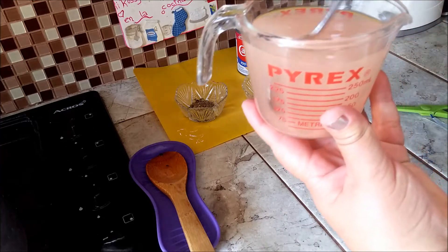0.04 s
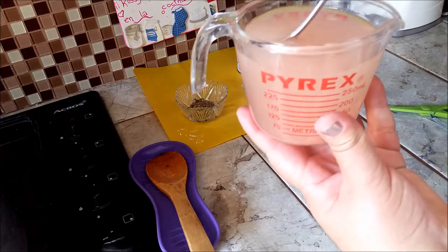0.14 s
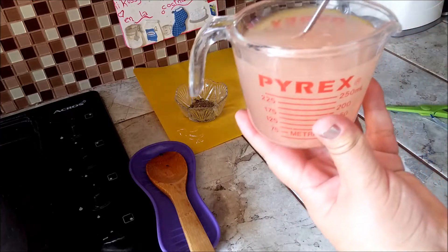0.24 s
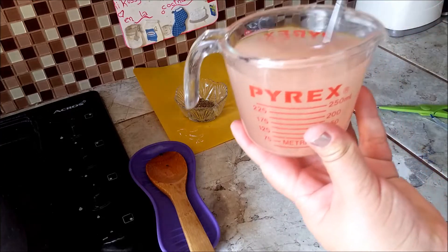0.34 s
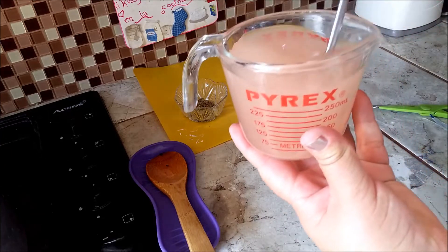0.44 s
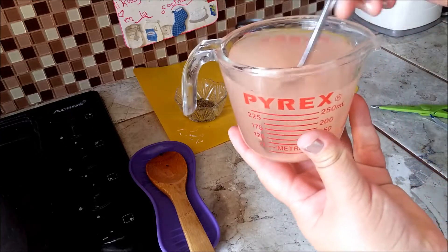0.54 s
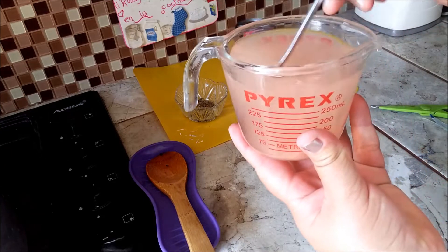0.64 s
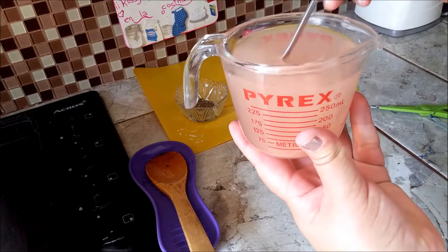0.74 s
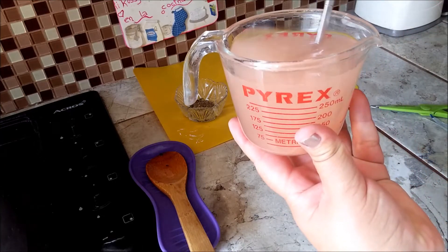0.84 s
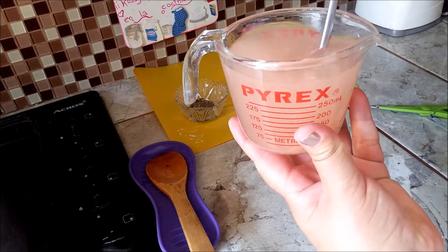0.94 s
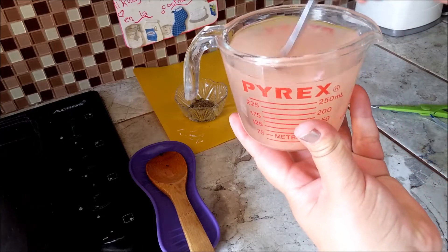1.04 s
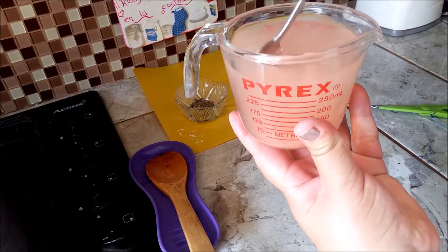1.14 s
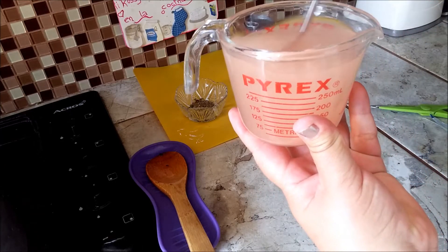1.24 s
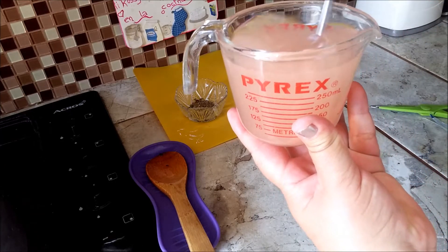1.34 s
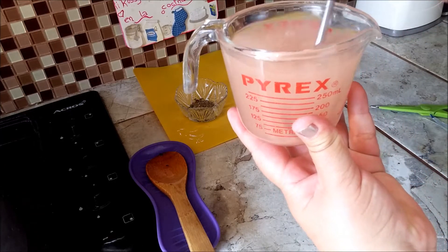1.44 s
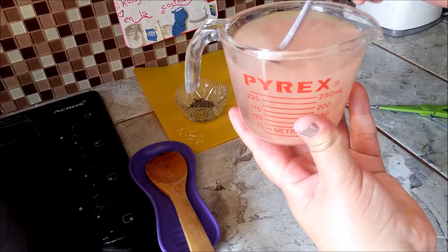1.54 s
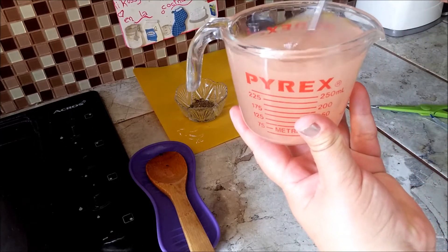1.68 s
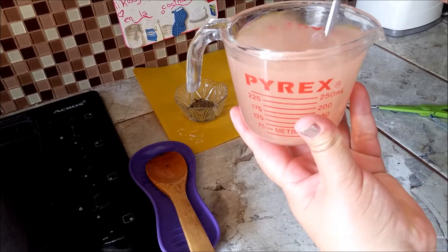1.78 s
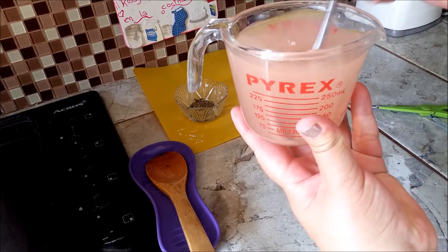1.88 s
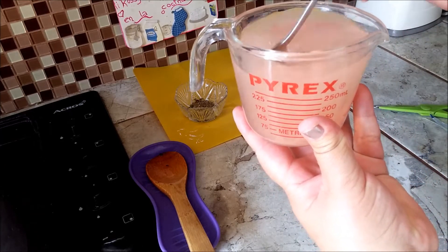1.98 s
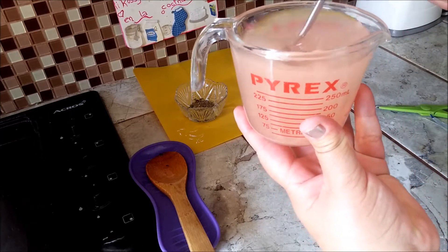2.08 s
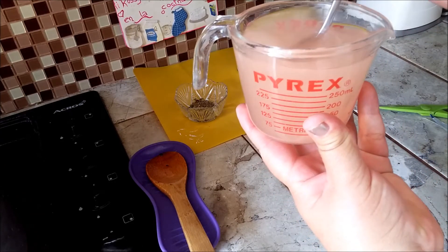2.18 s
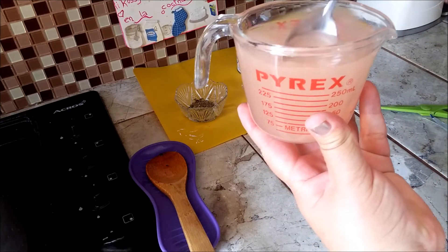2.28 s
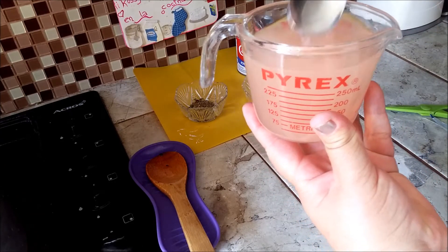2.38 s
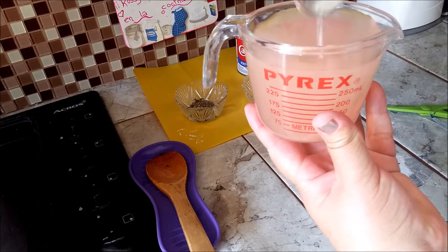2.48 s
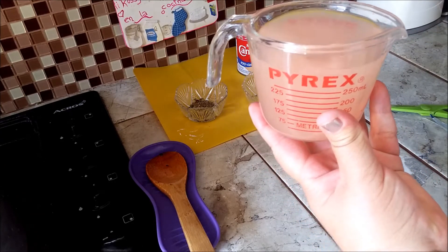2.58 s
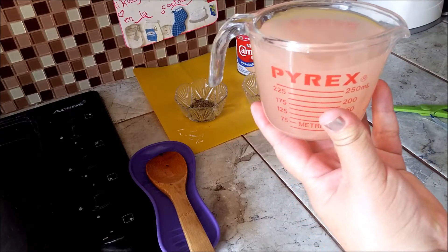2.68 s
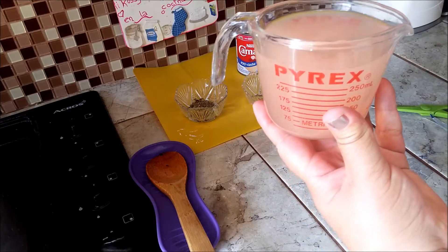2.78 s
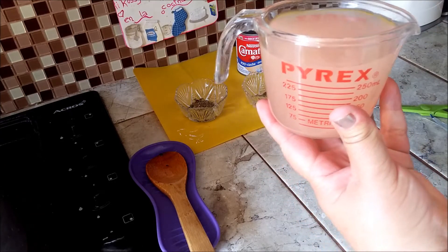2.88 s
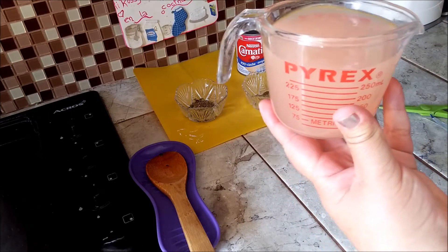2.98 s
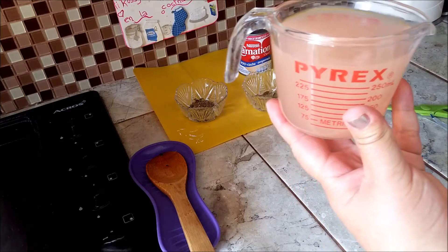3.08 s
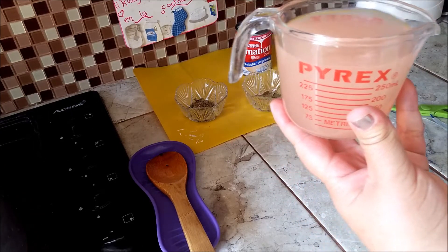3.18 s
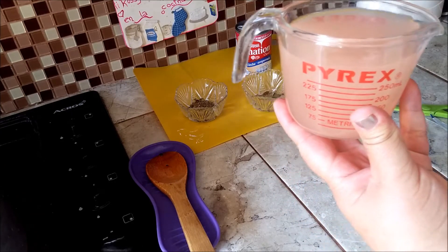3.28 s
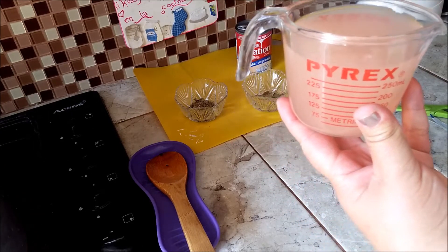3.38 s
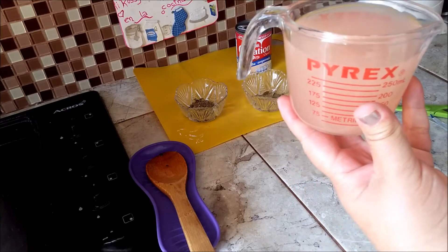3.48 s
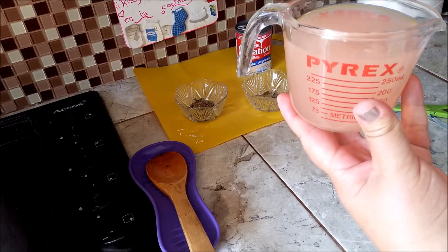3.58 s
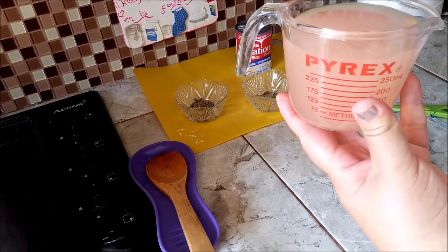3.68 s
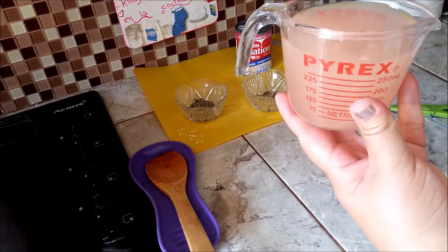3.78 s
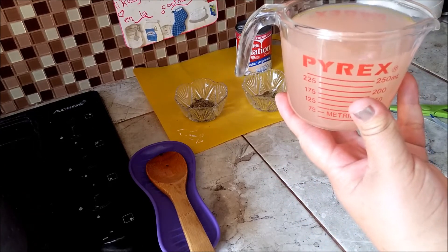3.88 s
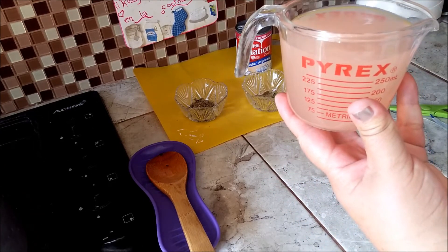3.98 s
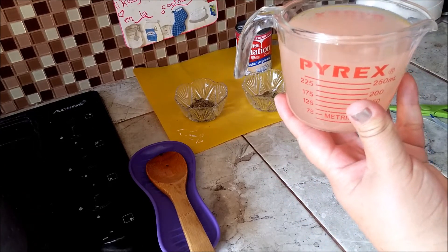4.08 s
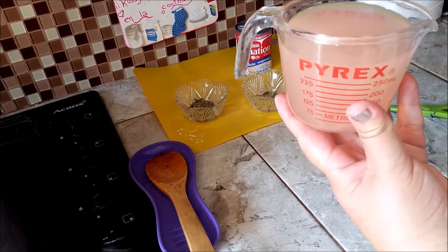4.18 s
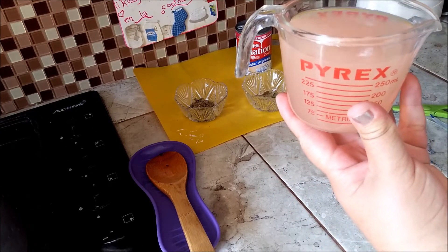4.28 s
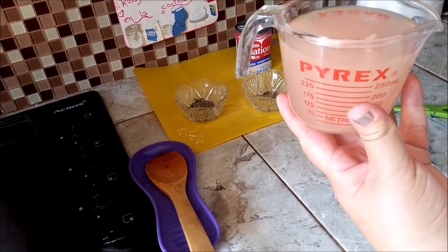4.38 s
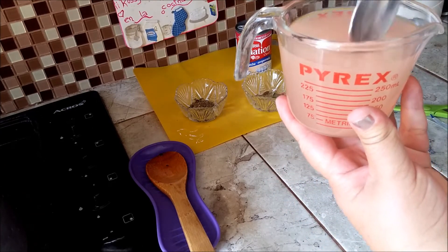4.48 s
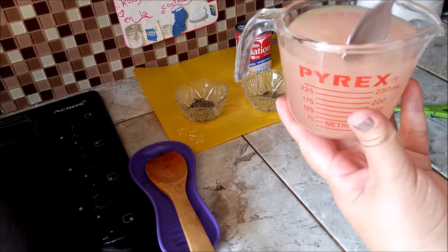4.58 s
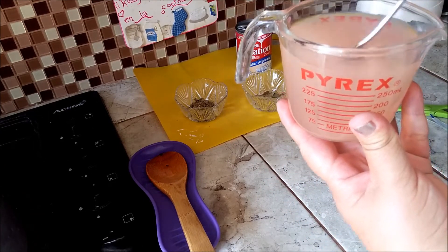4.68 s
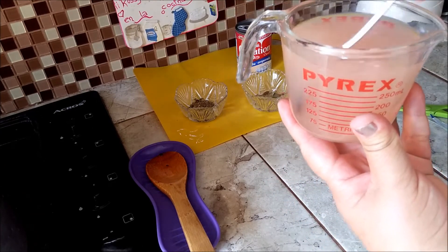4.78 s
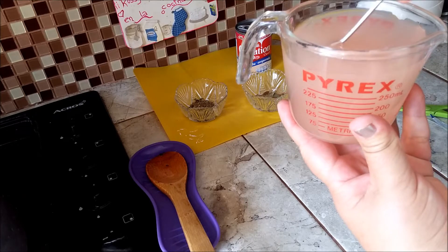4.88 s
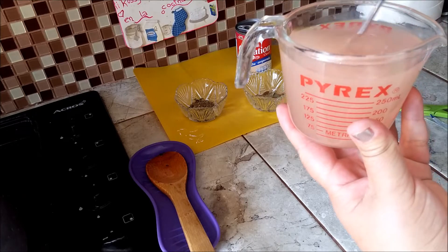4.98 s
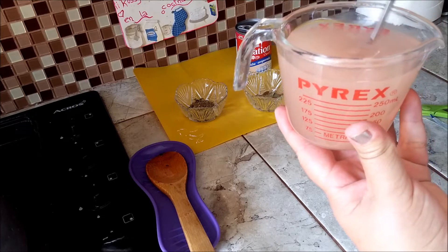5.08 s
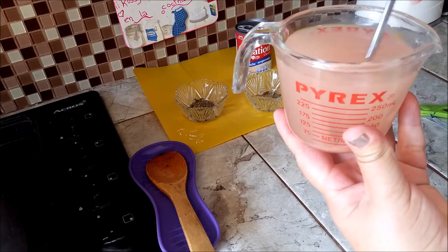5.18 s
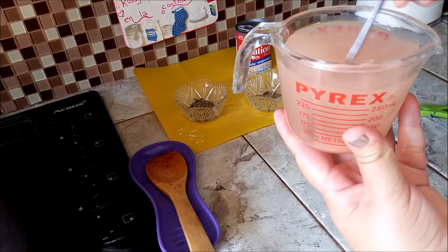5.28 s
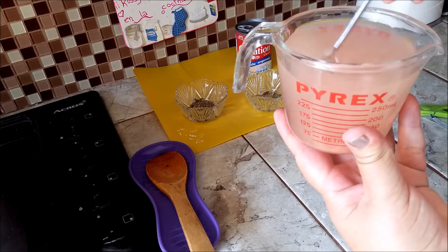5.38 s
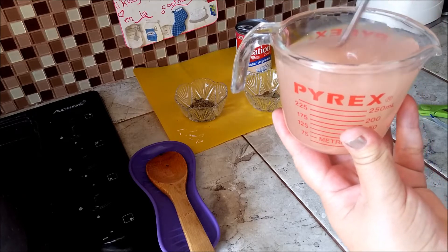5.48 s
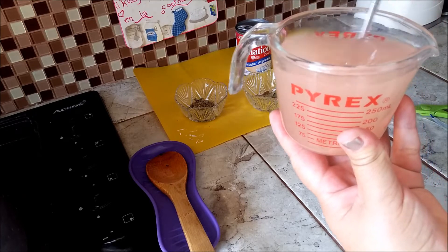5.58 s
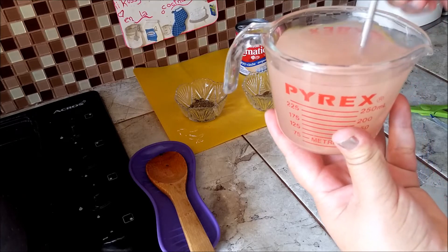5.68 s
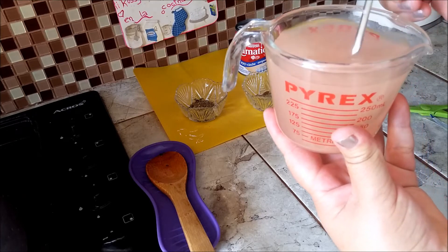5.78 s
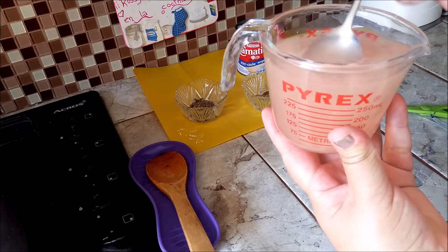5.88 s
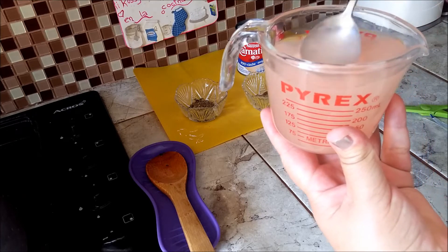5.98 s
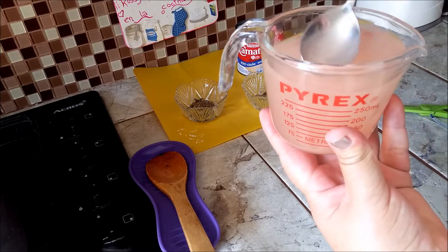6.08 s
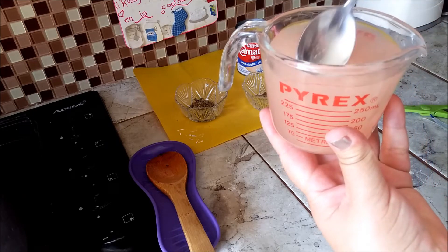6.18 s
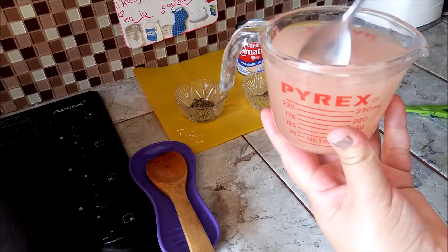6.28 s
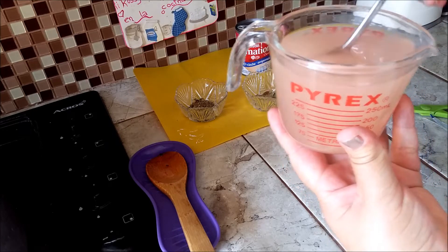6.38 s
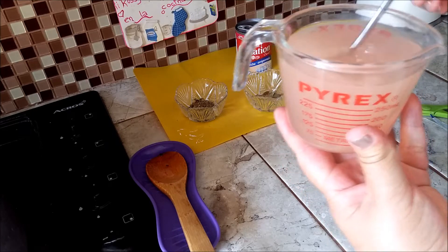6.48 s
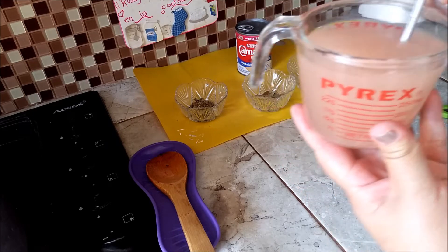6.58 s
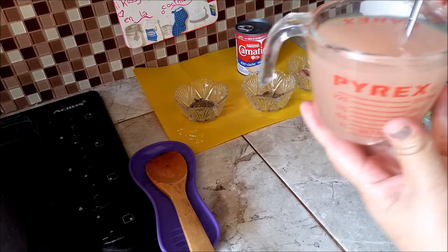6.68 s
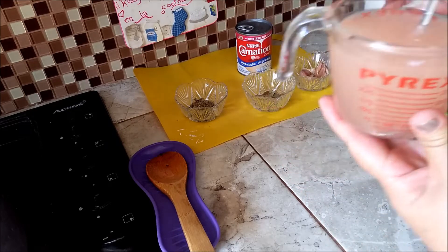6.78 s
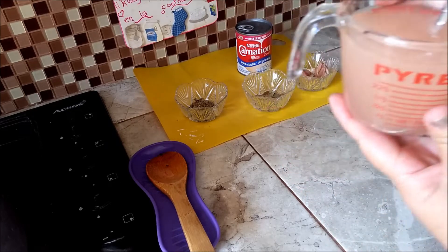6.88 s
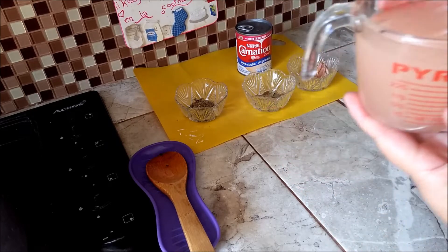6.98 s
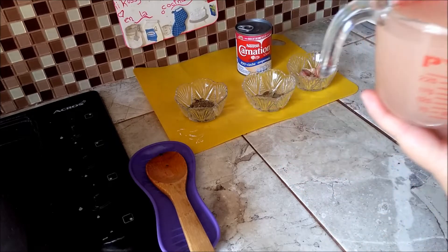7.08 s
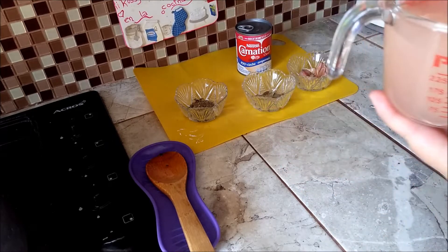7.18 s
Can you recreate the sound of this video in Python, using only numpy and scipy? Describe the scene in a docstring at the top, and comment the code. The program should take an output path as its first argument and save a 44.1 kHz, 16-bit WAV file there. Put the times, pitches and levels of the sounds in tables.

```python
"""A steel spoon stirs liquid in a hand-held glass measuring cup, close up in a tiled kitchen.
For two seconds it clinks briskly, each touch ringing glass and spoon. A lull follows, with a few
bubbles and wet ticks. Near 5 s lighter touches return, detuned by the swirl and choked as the spoon
stays on the glass; one firm clink lands at 6.7 s and two faint ones close. Appliance hum and fan air
lie under it all, and the left channel is much weaker than the right."""
import sys
import numpy as np
from scipy import signal
from scipy.fft import rfft, irfft, next_fast_len
from scipy.io import wavfile

SR = 44100
rng = np.random.default_rng(int(sys.argv[2]) if len(sys.argv) > 2 else 0)


def persist_wave(psi):
    """Save psi, clipped to +-1, as 16-bit WAV."""
    counts = np.round(np.clip(psi, -1, 1) * 32767).astype(np.int16)
    wavfile.write(sys.argv[1], SR, np.atleast_2d(counts).T)


N = 319725
RING_TIME = np.arange(int(.56 * SR)) / SR   # seconds since a hit

# Spoon hits; where each lands sets its mix:
# t/s, contact level/dB, spoon level/dB, low wall level/dB, rim level/dB, rim f/Hz, lead overtone f/Hz
HITS = [(0.0375, -28.5, -31, -27.5, -9, 3193, 6120), (0.2457, -37.5, -24.5, -32.5, -27, 3150, 5400),
        (0.4236, -27.5, -27, -25.5, -14.5, 3165, 4900), (0.562, -27.5, -33, -57, -16, 3164, 5490),
        (0.7814, -48, -42, -50, -49, 3170, 5150), (0.8812, -47, -38, -49, -63, 3150, 5920),
        (0.8926, -35, -32.5, -38.5, -48, 3170, 6210), (1.0548, -23.5, -32.5, -38, -11, 3118, 5330),
        (1.2752, -28.5, -13, -42.5, -12.5, 3115, 5228), (1.3934, -30, -27, -32, -23, 3130, 5610),
        (1.694, -33, -16.5, -46, -25.5, 3075, 5080), (1.7967, -40.5, -36, -41, -35.5, 3160, 5220),
        (1.8694, -46, -30, -45, -58, 3100, 4780), (1.924, -27.5, -31, -37.5, -27, 3114, 4920),
        (2.088, -29.5, -14, -48, -24.5, 3053, 4770), (4.8286, -38.5, -64, -42, -36, 3126, 5830),
        (4.8914, -42, -28.5, -40, -25.5, 3087, 4610), (5.04, -38, -29.5, -51, -41.5, 3115, 5680),
        (5.2624, -47.5, -38, -45.5, -39.5, 3084, 5560), (5.464, -46.5, -36, -47.5, -40, 2950, 4580),
        (5.6006, -40.5, -33.5, -41.5, -43, 3088, 5550), (6.553, -34, -30, -53, -35.5, 3092, 5460),
        (6.6521, -22, -23.5, -28, -16.5, 3391, 5010), (6.999, -44.5, -47.5, -56, -30.5, 3090, 5700),
        (7.136, -65, -50.5, -58, -48, 3060, 5300)]
# The swirl pulls the pitch down; holding the spoon on the glass chokes the ring:
# t/s, spoon f/Hz, low wall f/Hz, ring time/share
SWIRL = [(0.04, 2411, 1251, 0.84), (0.56, 2381, 1214, 0.82), (1.28, 2268, 1236, 0.84),
         (2.089, 2303, 1197, 1), (4.97, 2088, 1232, 0.58), (5.599, 2016, 1216, 0.52),
         (6.6, 1928, 1207, 0.84), (7.0, 1910, 1213, 0.83)]


def clinks(bass_cut_hz=330):
    """Steel strikes glass: both ring, with a sheen of overtones and a hard click on top."""
    out = np.zeros(N)
    swirl_s, *curves = np.transpose(SWIRL)
    attack = 1 - np.exp(-RING_TIME / 0.0008)   # the contact builds up over a moment
    for s, contact_db, spoon_db, low_db, rim_db, rim_hz, lead_hz in HITS:
        spoon_hz, low_hz, ring = (np.interp(s, swirl_s, curve) for curve in curves)
        push_db = contact_db + 0.25 * (spoon_db - contact_db)
        body = glass_wall(low_hz, low_db, push_db, ring)
        body += glass_rim(rim_hz, rim_db, spoon_db, ring)
        body += spoon(spoon_hz, spoon_db)
        top = sheen(contact_db, lead_hz, ring) + contact_click(contact_db, ring)
        add(out, s, attack * (body + skid(top, ring)))
    low_cut = signal.butter(2, bass_cut_hz, "high", fs=SR, output="sos")   # a small cup radiates no bass
    return signal.sosfilt(low_cut, out + 1e-18)


# Higher wall modes: f/Hz, level/dB against the push of the hit, t60/s
HIGH_WALL_MODES = [(1725, -5, 0.73), (2080, -8, 0.57)]


def glass_wall(low_hz, low_db, push_db, ring):
    """The wall gives the long sustain: a beating low mode under two that the spoon can choke."""
    low = from_db(low_db + 1.5) * twin_mode(low_hz, t60=0.49, split_hz=24, share=0.21)
    high = sum(from_db(push_db + db) * ring * mode(hz, t60 * ring) for hz, db, t60 in HIGH_WALL_MODES)
    return low + high


def glass_rim(hz, rim_db, spoon_db, ring):
    """The rim sings a bright, slowly beating note; the next mode up detunes in step with it."""
    t60 = 0.31 * ring
    note = from_db(rim_db - 3) * twin_mode(hz, t60, split_hz=3.1, share=0.45)
    next_db = (rim_db + spoon_db) / 2 - 13.5
    return note + from_db(next_db) * mode(hz * 1.143, t60)


# Dull knock of the spoon's bowl on thick glass: f/Hz, level/dB
KNOCK_EQ = [(100, -12), (350, -10.5), (700, -20.5), (1000, -9), (1500, 4), (2600, 1.5), (3600, -23),
            (8000, -24)]


def spoon(hz, db):
    """The gripped spoon knocks and pings; the liquid damps it at once, leaving a weak after-ring."""
    decay = dying(t60=0.069) + from_db(-34) * dying(t60=0.12)
    ping = unit_attack(np.sin(2 * np.pi * hz * RING_TIME) * decay)
    return from_db(db + 2.5) * (ping + from_db(-12) * burst(KNOCK_EQ))


# Overtones of glass and spoon, in two registers: f/Hz, level/dB, t60/s
LOW_SHEEN = [(2735, -11.5, 0.057), (3040, -65, 0.024), (3736, -4.5, 0.037), (3965, -3, 0.085),
             (4038, -1, 0.044), (4280, -30.5, 0.072), (4150, -24, 0.12)]
HIGH_SHEEN = [(5070, 0, 0.077), (5200, 4, 0.1), (5355, 0, 0.032), (5120, -22, .04), (5207, 12.5, 0.011),
              (5720, -10, 0.16), (6180, 3.5, 0.099), (5940, -14.5, 0.074), (6450, -6.5, 0.18),
              (6800, -11, 0.085)]


def sheen(contact_db, lead_hz, ring):
    """Hard contact wakes the overtones; firm hits favour the lower register."""
    high = from_db(-2.5) * overtones(HIGH_SHEEN, ring)
    lead = from_db(1) * unit_attack(mode(lead_hz, t60=0.044 * ring))
    low = from_db(expand(contact_db, ratio=1.64) - 5) * overtones(LOW_SHEEN, ring)
    return low + from_db(contact_db) * (high + lead)


# Topmost modes of glass and spoon: f/Hz, level/dB, t60/s
TICK_MODES = [(8360, -7, 0.038), (8050, 2, 0.017), (9200, -9, 0.05), (9100, 0, 0.06), (9000, -8, 0.028),
              (10170, -1, 0.1), (10900, -1, 0.013), (11700, -2, 0.027), (12700, -6, .03)]
# Colour of the contact crack: f/Hz, level/dB
CRACK_EQ = [(250, 3), (800, -28), (1400, -5.5), (2600, -4.5), (5000, 7), (6500, 5), (7200, -1), (8500, 3),
            (10500, 0.5), (12500, -7.5), (16000, -28.5)]


def contact_click(contact_db, ring):
    """The transient of steel meeting glass: a pitched tick inside a crack of noise."""
    db = expand(contact_db, ratio=1.015)
    return from_db(db - 15) * overtones(TICK_MODES, ring) + from_db(db + 4.5) * burst(CRACK_EQ)


def skid(hit, ring, slips_per_s=500):
    """The spoon skids on: random slips retrigger the hit, harder when it is held on the glass."""
    slip_db = -11.5 + 15 * (1 - ring)
    slipping = rng.random(len(hit)) < slips_per_s / SR
    slips = slipping * rng.standard_normal(len(hit)) * from_db(slip_db) * dying(t60=0.07)
    slips[0] = 1   # the hit itself
    return signal.fftconvolve(hit, slips)[:len(hit)]


# Bubble blips: t/s, starting f/Hz, level/dB
BLIPS = [(3.314, 996, -35.5), (3.700, 936, -51.5), (4.257, 1040, -50), (5.372, 4940, -26),
         (5.384, 2810, -22.5), (5.385, 3580, -23), (5.441, 984, -43.5), (5.473, 1000, -42),
         (5.851, 3240, -45), (6.88, 2870, -29.5)]


def bubbles(cycles=13.7, rise=0.26):
    """Bubbles bend up in pitch as they near the surface, then stop."""
    out = np.zeros(N)
    for s, hz, db in BLIPS:
        age = np.linspace(0, 1, int(cycles / hz * SR))
        phase = 2 * np.pi * np.cumsum(hz * (1 + rise * age ** 2)) / SR
        envelope = np.minimum(8 * age, 1) * (1 - age ** 3)
        add(out, s, from_db(db) * np.sin(phase) * envelope)
    return out


# Snaps of liquid film: t/s, level/dB
SNAPS = [(0.995, -43.5), (1.1702, -39), (2.7559, -44), (3.111, -53.5), (4.6338, -51), (5.361, -46),
         (5.372, -46), (5.3838, -35), (6.881, -42)]
# Their colour: f/Hz, level/dB
SNAP_EQ = [(1500, 0), (4000, -1), (6500, 1.5), (8500, 1.5), (11000, 3), (13000, -4.5), (16000, -14)]


def wet_ticks():
    """Films of liquid snap with a small, bright tick."""
    out = np.zeros(N)
    for s, db in SNAPS:
        add(out, s, from_db(db + 0.5) * burst(SNAP_EQ))
    return out


# Colour of the kitchen reverb: f/Hz, level/dB against its input
TILE_EQ = [(500, 5), (1000, -1), (1200, -4.5), (1750, -5), (2300, -11.5), (2700, -5.5), (3100, -7.5),
           (3900, -4), (6000, -7.5), (10000, -2.5), (16000, 5)]


def kitchen(send, predelay_s=0.00239, tail_cut_hz=7500):
    """Strong early reflections off worktop and tiles, then the duller tail of the room."""
    early, tail = rng.standard_normal((2, len(RING_TIME)))
    tail = signal.sosfilt(signal.butter(1, tail_cut_hz, fs=SR, output="sos"), tail)
    echoes = from_db(4) * early * dying(t60=0.07) + tail * dying(t60=0.35)
    echoes *= RING_TIME > predelay_s
    response = coloured(echoes / np.linalg.norm(echoes), TILE_EQ)
    return signal.fftconvolve(send, response)[:N]


# Appliance hum: f/Hz, right level/dB, left offset/dB
HUM_LINES = [(61, -65.5, -8.5), (119.9, -81, -22), (239.95, -39, -19.5)]


def appliance_hum(waver_db=1.37):
    """Mains-driven tones whose level wavers slightly."""
    t = np.arange(N) / SR
    knots = np.linspace(0, t[-1], num=40)
    waver = from_db(waver_db * np.interp(t, knots, rng.standard_normal(len(knots))))
    return waver * sum(from_db([[db + left_db], [db]]) * np.sin(2 * np.pi * (hz * t + rng.random()))
                       for hz, db, left_db in HUM_LINES)


# Bed of fan and room air: f/Hz, right level/dB per Hz
AIR_EQ = [(12, -76.5), (30, -100), (80, -96), (110, -80.5), (140, -88.5), (200, -75.5), (300, -81.5),
          (460, -77), (520, -84.5), (800, -91), (1050, -88.5), (1500, -93.5), (6200, -97), (7800, -108),
          (10500, -109), (15500, -120)]
# Its channel balance: f/Hz, left minus right level/dB
AIR_LEFT_TRIM = [(60, -4), (110, -29), (200, -10), (380, -20.5), (700, -10), (1290, -11.5), (2380, -9),
                 (4400, -10.5), (8120, -9), (15000, -2.5)]
# Its width: f/Hz, left-right correlation
AIR_CORRELATION = [(60, -0.084), (130, 0.59), (290, 0.99), (640, 0.4), (1410, -0.29), (3100, 0.18),
                   (6820, -0.3), (15000, 0.3)]


def fan_air():
    """Steady fan noise, narrow in the upper bass and wide elsewhere."""
    hz = np.fft.rfftfreq(N, 1 / SR)
    right, other = rfft(rng.standard_normal((2, N))) * from_db(at_hz(AIR_EQ, hz)) * np.sqrt(SR / 2)
    alike = at_hz(AIR_CORRELATION, hz)
    left = from_db(at_hz(AIR_LEFT_TRIM, hz)) * (alike * right + np.sqrt(1 - alike ** 2) * other)
    return irfft([left, right], N)


def mode(hz, t60):
    """A damped sine of random polarity."""
    return rng.choice([-1, 1]) * np.sin(2 * np.pi * hz * RING_TIME) * dying(t60)


def twin_mode(hz, t60, split_hz, share):
    """A glass mode split into two close ones that beat."""
    turn = 2 * np.pi * RING_TIME
    lower = (1 - share) * np.sin((hz - share * split_hz) * turn)
    upper = share * np.sin((hz + (1 - share) * split_hz) * turn)
    return (lower + upper) * dying(t60)


def overtones(modes, ring, detune=0.00775, scatter_db=2):
    """Each contact point excites and detunes the high modes differently."""
    out = np.zeros(len(RING_TIME))
    for hz, db, t60 in modes:
        gain = from_db(db + scatter_db * rng.normal())
        out += gain * mode(hz * (1 + detune * rng.normal()), t60 * ring)
    return unit_attack(out)


def burst(eq, t60=0.021, size=4096):
    """A crack of noise that dies within milliseconds."""
    crack = coloured(rng.standard_normal(size) * dying(t60)[:size], eq)
    return unit_attack(np.pad(crack, (0, len(RING_TIME) - size)))


def coloured(x, eq):
    """Minimum-phase EQ: nothing rings ahead of a transient."""
    size = 2 * next_fast_len(len(x))
    gain = from_db(at_hz(eq, np.fft.rfftfreq(size, 1 / SR)))
    cepstrum = irfft(np.log(gain))
    cepstrum[1:size // 2] *= 2
    cepstrum[size // 2 + 1:] = 0
    return irfft(rfft(x, size) * np.exp(rfft(cepstrum)))[:len(x)]


def expand(db, ratio, firm_db=-28.5):
    """Stretch the dynamics around the level of a firm hit."""
    return firm_db + ratio * (db - firm_db)


def unit_attack(x):
    """Scale a hit to rms 1 over its first 8 ms."""
    return x / np.sqrt(np.mean(x[:int(.008 * SR)] ** 2))


def dying(t60):
    return from_db(-60 * RING_TIME / t60)


def from_db(db):
    return 10 ** (np.asarray(db) / 20)


def at_hz(curve, hz):
    curve_hz, values = np.transpose(curve)
    return np.interp(np.log(hz + 1e-3), np.log(curve_hz), values)


def add(track, s, sound):
    """Lay a sound into the track at time s."""
    start = round(s * SR)
    track[start:start + len(sound)] += sound[:N - start]


def scene(left_lag_samples=4):
    """Clinks, reflections, hum and air, all strong in the right channel and faint in the left."""
    glass, liquid = clinks(), bubbles() + wet_ticks()
    direct = glass + liquid
    send = glass + from_db(-2.5) * liquid   # down in the cup, the liquid reaches the walls less
    delayed = np.pad(direct, (left_lag_samples, 0))[:N]
    left = from_db(-26) * delayed + from_db(-14) * kitchen(send)
    right = direct + kitchen(send)
    return np.array([left, right]) + appliance_hum() + fan_air()


def record(dry, cutoff_hz=16200):
    """A steep high cut on the whole mix."""
    return signal.sosfilt(signal.ellip(10, .1, 80, cutoff_hz, fs=SR, output="sos"), dry)


dry = scene()
out = record(dry)
persist_wave(out)
```